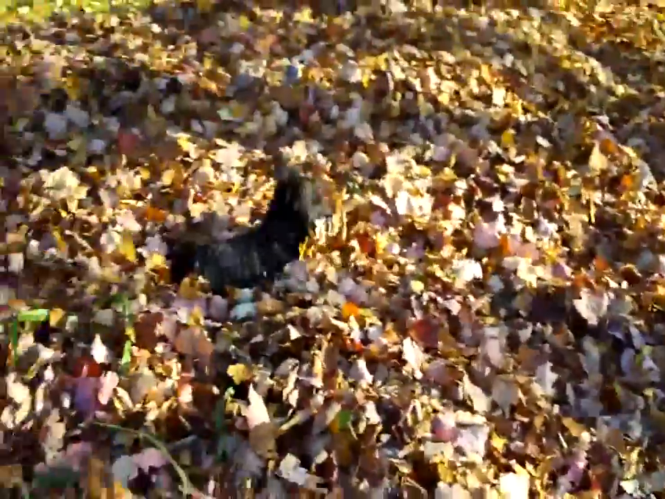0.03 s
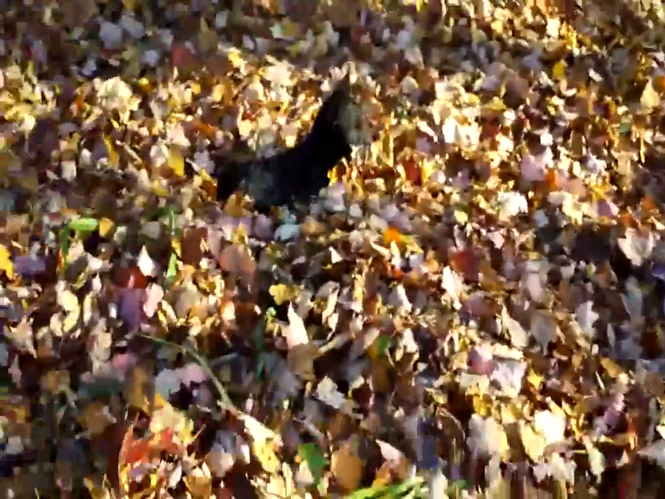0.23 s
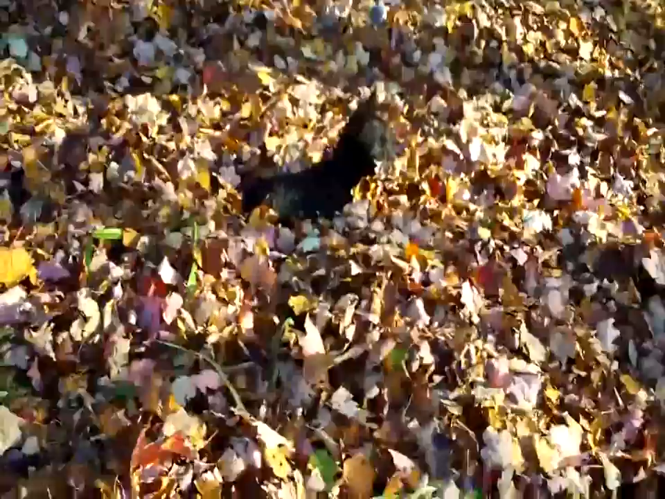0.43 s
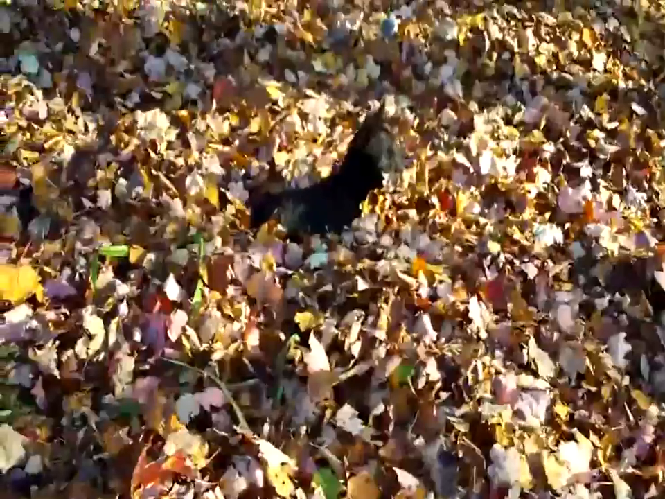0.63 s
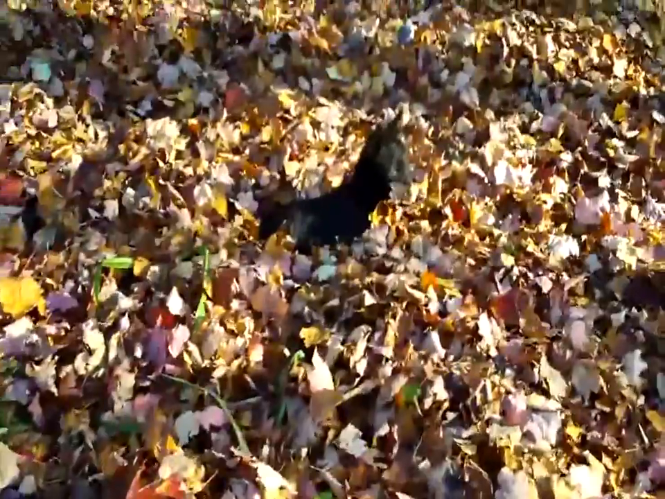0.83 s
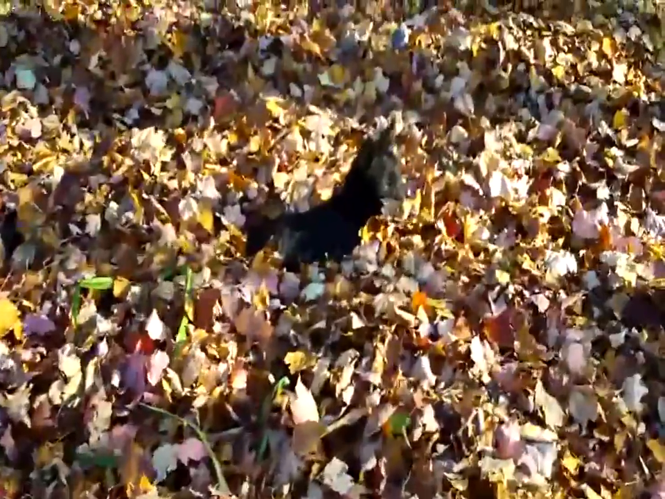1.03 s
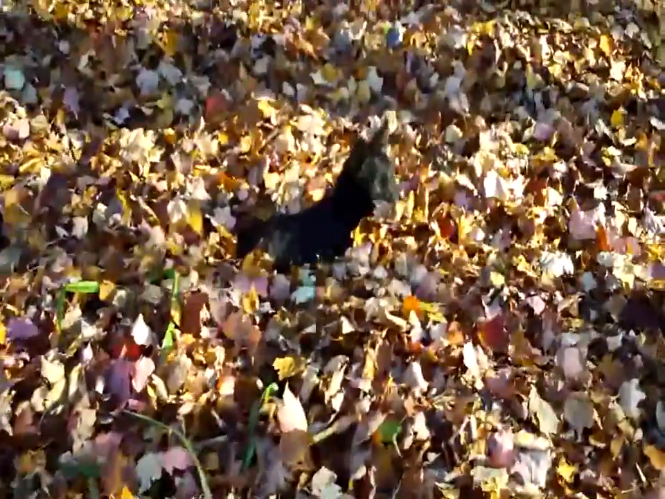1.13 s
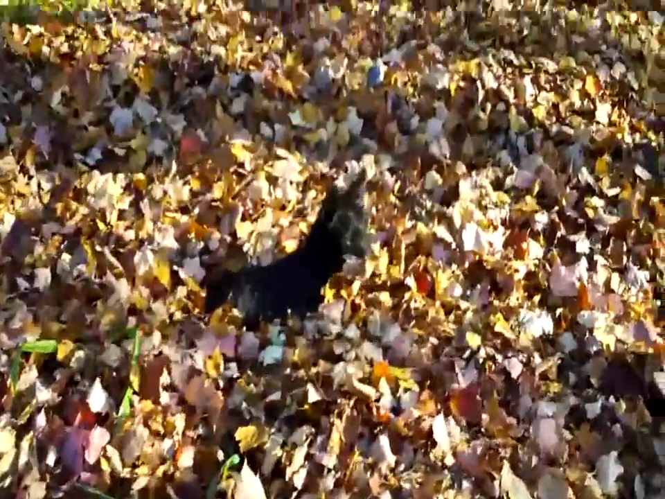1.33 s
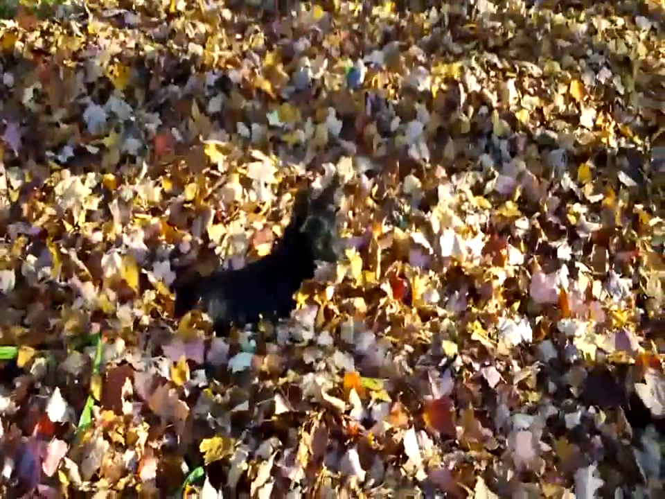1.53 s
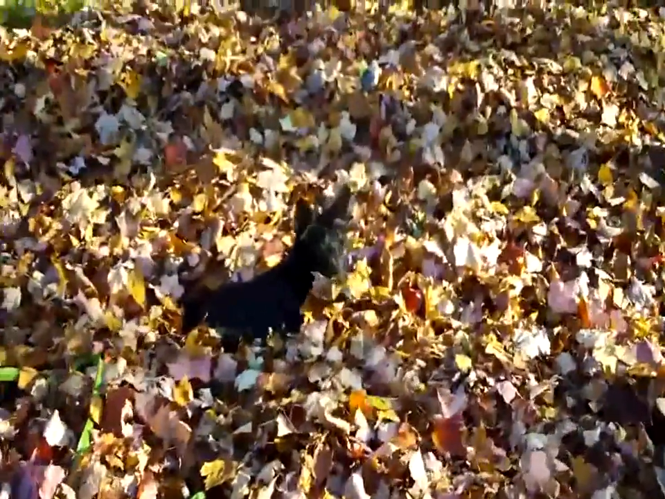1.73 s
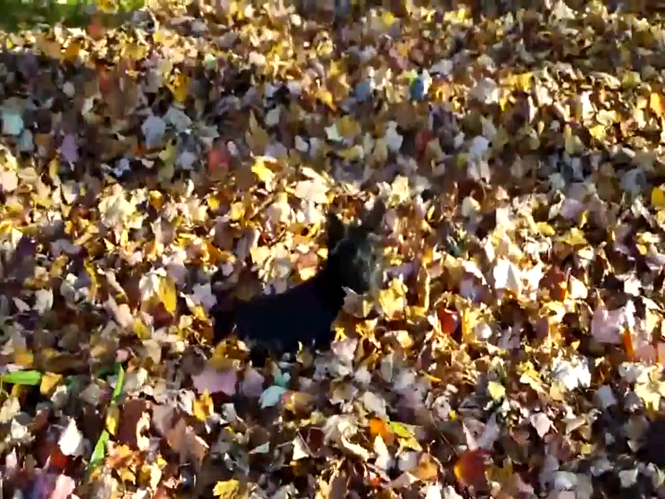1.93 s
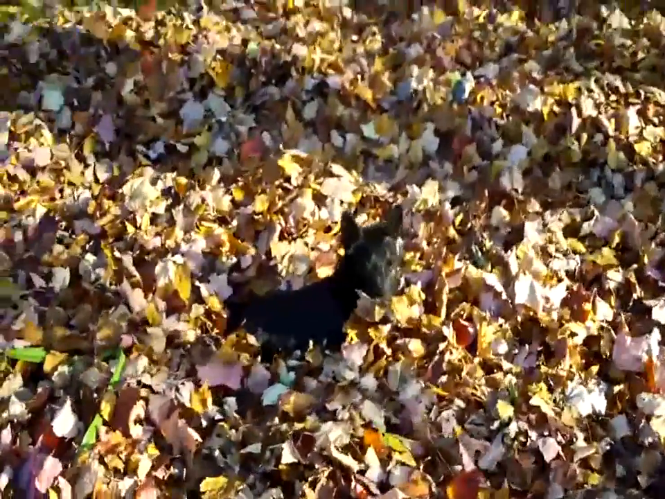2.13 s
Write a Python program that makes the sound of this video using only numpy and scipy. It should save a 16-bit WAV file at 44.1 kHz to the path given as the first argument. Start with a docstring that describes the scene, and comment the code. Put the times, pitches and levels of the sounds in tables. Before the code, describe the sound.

A small dog gives two sharp, raspy yaps in quick succession outdoors, each with a brief dull echo. Dry leaves rustle softly before and after, while light wind puffs on the microphone over a faint distant engine hum.

```python
"""A small dog lying in dry leaves yaps twice. In each yap a thin squeal arches up and down while the
voice catches on two throat resonances in turn, roughened by rasp, low growls and a few snaps of the
vocal folds. The yard answers with a short, dull echo. Leaves rustle and crackle in swells over a bed
of soft wind and the hum of a far engine."""
import sys
import numpy as np
from scipy import signal
from scipy.fft import rfft, irfft
from scipy.io import wavfile
from scipy.ndimage import uniform_filter1d

SR = 44100
rng = np.random.default_rng(int(sys.argv[2]) if len(sys.argv) > 2 else 0)


def waveform_to_disk(signal):
    """Save audio, clipped to [-1, 1], as 16-bit WAV at the path in sys.argv[1]."""
    frames = np.transpose(np.atleast_2d(signal))
    scaled = np.clip(frames, -1, 1) * 32767
    samples = np.round(scaled).astype(np.int16)
    wavfile.write(sys.argv[1], SR, samples)


N = 97020
T = np.arange(N) / SR

# tone of the outdoor air and of the wind puffs (frequency [Hz], relative level [dB])
AIR_COLOUR = [(20, 1.5), (32, -1.5), (42, -3), (55, 2), (72, -12), (105, -3.5), (160, -15.5), (280, -20),
              (420, -22.5), (750, -19), (1400, -23.5), (2500, -31.5), (5000, -33), (9000, -52.5)]
PUFF_COLOUR = [(10, 24), (28, -6), (55, -1.5), (120, -45), (500, -70)]
# wind puffs on the microphone (time [s], half length [s], level [dB])
PUFFS = [(.26, 0.15, -31.5), (.505, 0.053, -23.5), (1.91, 0.043, -42)]

# swells of the rustle (time [s], level [dB])
RUSTLE = [(0, -42), (.08, -46.5), (.15, -39.5), (.23, -43), (.4, -47), (.62, -67), (.85, -48), (.92, -47.5),
          (.98, -40), (1.08, -46), (1.3, -53.5), (1.42, -64), (1.48, -63), (1.7, -54), (1.85, -47.5),
          (1.92, -40), (2.1, -38.5), (2.2, -35)]
# soft shuffles deep in the leaves (time [s], half length [s], level [dB])
SHUFFLES = [(.16, 0.02, -53), (1.655, 0.047, -47.5), (1.745, .018, -43), (1.82, 0.02, -51),
            (1.98, 0.13, -47.5)]
# single leaves crackling (time [s], level [dB])
CRACKLES = [(1.444, -41), (1.775, -39.5), (1.786, -48)]
# tone of the three leaf layers (frequency [Hz], relative level [dB])
RUSTLE_COLOUR = [(200, -9), (600, -1.5), (1200, -1), (2500, 1), (3300, 0), (4400, 2), (5300, -1.5),
                 (6500, -19.5), (9000, -45)]
SHUFFLE_COLOUR = [(120, -25), (260, -19), (420, -5), (700, -3), (1400, -7), (2200, -23), (5000, -37)]
CRACKLE_COLOUR = [(1000, -23), (2500, -1), (4000, -2), (5300, 0), (6500, -15), (9000, -40)]

# rasp contour, per yap (time [s], level [dB])
RASP = [
    [(.676, -47), (.692, -37), (.701, -29.5), (.718, -29), (.745, -28.5), (.765, -30.5), (.785, -32.5),
     (.800, -37), (.812, -41)],
    [(1.108, -41.5), (1.122, -34.5), (1.138, -26), (1.150, -25.5), (1.168, -25), (1.185, -29.5),
     (1.215, -36.5), (1.229, -48), (1.238, -49)],
]
# throat resonances, per yap (frequency [Hz], width [Hz], relative level [dB])
THROATS = [
    [(810, 120, -10.5), (1540, 290, -1.5), (2330, 245, -4), (2910, 420, -8.5), (3700, 680, -15),
     (4680, 240, -8)],
    [(780, 44, -4), (1440, 206, 8.5), (1860, 180, 4.5), (2290, 600, 1.5), (3000, 270, -25), (4270, 184, 0)],
]
# low voice, high voice taking over as it breaks, and squeal, per yap (time [s], pitch [Hz], level [dB])
LOW_VOICE = [
    [(.679, 730, -36), (.698, 720, -27), (.713, 775, -26), (.722, 803, -16.5), (.738, 812, -17),
     (.750, 808, -29), (.762, 805, -44), (.777, 805, -30), (.800, 800, -32)],
    [(1.138, 770, -36), (1.145, 755, -27), (1.151, 785, -18), (1.166, 760, -21), (1.181, 755, -35),
     (1.205, 775, -32), (1.220, 760, -37), (1.228, 730, -30), (1.236, 610, -42), (1.250, 530, -44)],
]
HIGH_VOICE = [
    [(.741, 1410, -24), (.745, 1425, -19.5), (.753, 1450, -21), (.757, 1520, -32)],
    [(1.152, 1350, -32), (1.158, 1440, -23), (1.163, 1550, -29), (1.168, 1290, -25), (1.175, 1345, -17),
     (1.190, 1430, -21.5), (1.203, 1340, -25), (1.213, 1140, -29), (1.218, 1060, -40)],
]
SQUEALS = [
    [(.702, 980, -35), (.715, 1520, -29), (.727, 2200, -44), (.747, 2280, -27), (.756, 1880, -28),
     (.761, 1660, -30), (.773, 1770, -26), (.781, 1600, -28), (.793, 1080, -35)],
    [(1.109, 980, -38), (1.122, 1230, -27), (1.133, 1530, -29), (1.145, 1950, -32), (1.149, 2340, -32),
     (1.160, 2290, -29), (1.170, 1980, -30), (1.177, 1720, -29), (1.185, 1680, -42)],
]
# harmonics 2, 3, ... at full strength, the low voice's per yap (level against the fundamental [dB])
LOW_OVERTONES_DB = [(-25, -10, -42, -26), (-14, -19, -32, -24.5)]
HIGH_OVERTONES_DB, SQUEAL_OVERTONES_DB = (-22, -25), (-22, -28)
SQUEAL_JITTER = (.015, .035)  # per yap, as a share of the pitch
# growls as the folds start and stop (time [s], half length [s], level [dB])
GROWLS = [(.696, .016, -31), (.796, .008, -36), (1.238, .016, -43)]
# tone of the growls (frequency [Hz], relative level [dB])
GROWL_COLOUR = [(100, -44), (220, -3), (340, -9), (480, 0.5), (650, -12.5), (1000, -4), (1600, -30),
                (4000, -61)]
# snaps of the vocal folds (time [s], level into the throat [dB])
SNAPS = [(.6832, 5), (.6953, 13.5), (.7928, 7), (1.1490, -0.5), (1.2265, -1)]
# resonances of the slack throat (frequency [Hz], width [Hz], gain [dB])
SLACK_THROAT = [(583, 200, 3), (773, 110, 12.5), (1480, 370, -3), (2600, 530, -7.5), (3200, 480, -10.5),
                (4370, 170, -8.5)]
# slaps from the yard (delay [s], gain [dB])
ECHOES = [(.030, -32), (.060, -16.5), (.085, -29), (.110, -29)]


def undb(db):
    """Decibels to gain."""
    return 10 ** (np.asarray(db) / 20)


def unit(x):
    """Scale to rms 1."""
    return x / np.sqrt(np.mean(x ** 2))


def drift(rate_hz):
    """Smooth random modulation with rms 1."""
    span = max(int(SR / rate_hz), 1)
    smoothed = uniform_filter1d(rng.standard_normal(N), span, mode="wrap")
    return unit(uniform_filter1d(smoothed, span, mode="wrap"))


def lowpass(x, hz):
    """Gentle treble roll-off."""
    return signal.sosfilt(signal.butter(2, hz, fs=SR, output="sos"), x)


def colour(x, points):
    """EQ through (frequency [Hz], relative level [dB]) points, scaled to rms 1."""
    hz, db = np.array(points).T
    bins_hz = np.maximum(np.fft.rfftfreq(N, 1 / SR), 1)
    curve = undb(np.interp(np.log(bins_hz), np.log(hz), db))
    return unit(irfft(rfft(x) * curve, N))


def noise(points):
    """Coloured noise with rms 1."""
    return colour(rng.standard_normal(N), points)


def resonate(x, modes, low_cut_hz):
    """Parallel resonances of alternating polarity, then a low cut."""
    ringing = sum((-1) ** k * undb(db) * signal.lfilter(*signal.iirpeak(hz, hz / width, fs=SR), x)
                  for k, (hz, width, db) in enumerate(modes))
    return signal.sosfilt(signal.butter(2, low_cut_hz, "high", fs=SR, output="sos"), ringing)


def swells(rows):
    """Bell-shaped fades from (time [s], half length [s], level [dB]) rows."""
    return sum(undb(db) * np.exp(-((T - s) / half) ** 2) for s, half, db in rows)


def envelope(times, db, attack_s=0.012, release_s=0.0058):
    """A level contour with a quick attack before it and a release after it."""
    before, after = np.maximum(times[0] - T, 0), np.maximum(T - times[-1], 0)
    return undb(np.interp(T, times, db)) * np.exp(-before / attack_s - after / release_s)


def wind(air_db=-37, side_db=-30):
    """A bed of soft air, a touch of stereo width in its rumble, and low puffs on the microphone."""
    mid, side = (noise(AIR_COLOUR) * undb(air_db + 0.6 * drift(10)) for _ in range(2))
    side = undb(side_db) * lowpass(side, hz=1500)
    puffs = noise(PUFF_COLOUR) * swells(PUFFS)
    return mid + puffs + np.array([side, -side])


def leaves(grains_per_s=5000, grain_spread_db=-0.08, crackle_decay_s=0.0099):
    """Tiny cracks of dry leaves blur into a rustle, with dull shuffles below and bright crackles on top."""
    grains = (rng.random(N) < grains_per_s / SR) * rng.standard_normal(N)
    grains *= undb(grain_spread_db * rng.exponential(size=N))
    rustle_db = np.interp(T, *np.array(RUSTLE).T) + drift(40)
    rustle = colour(grains, RUSTLE_COLOUR) * undb(rustle_db)
    shuffles = noise(SHUFFLE_COLOUR) * swells(SHUFFLES)
    bursts = sum(undb(db) * (T > s) * np.exp(-abs(T - s) / crackle_decay_s) for s, db in CRACKLES)
    return rustle + shuffles + noise(CRACKLE_COLOUR) * bursts


def far_engine(hum_hz=125):
    """A far engine's wavering hum and its faint octave, fading up just ahead of the first yap."""
    phase = 2 * np.pi * np.cumsum(hum_hz * (1 + 0.0124 * drift(6))) / SR
    hum = undb(-46.5) * np.sin(phase) + undb(-62) * np.sin(2 * phase)
    fader_db = np.interp(T, [.3, .6], [-7, 1]) + 1.44 * drift(20)
    return np.sqrt(2) * hum * undb(fader_db)


def rasp():
    """Fluttering breath noise rings the throat and gives each yap its grit."""
    out = np.zeros(N)
    for contour, throat in zip(RASP, THROATS):
        breath = rng.standard_normal(N) * undb(1.4 * drift(600))
        out += unit(resonate(breath, throat, low_cut_hz=450)) * envelope(*np.array(contour).T)
    return out


def fold_tone(contour, overtones_db, jitter, shimmer):
    """One vibration of the vocal folds, unsteady in pitch and level, brighter as it gets louder."""
    times, hz, db = np.array(contour).T
    pitch_hz = np.interp(T, times, hz) * (1 + jitter * drift(560))
    phase = 2 * np.pi * np.cumsum(pitch_hz) / SR
    strength = envelope(times, db)
    overtones = sum(undb(level) * np.sin(k * phase) for k, level in enumerate(overtones_db, 2))
    tone = np.sin(phase) + overtones * strength / strength.max()
    return np.sqrt(2) * tone * strength * (1 + shimmer * drift(630))


def voice():
    """Three fold vibrations overlap in each yap: a low voice breaks to a high one under a thin squeal."""
    out = np.zeros(N)
    for yap in range(len(SQUEALS)):
        out += fold_tone(LOW_VOICE[yap], LOW_OVERTONES_DB[yap], jitter=.014, shimmer=0.064)
        out += fold_tone(SQUEALS[yap], SQUEAL_OVERTONES_DB, jitter=SQUEAL_JITTER[yap], shimmer=0.29)
        out += fold_tone(HIGH_VOICE[yap], HIGH_OVERTONES_DB, jitter=0.0156, shimmer=0.057)
    return out


def growl(flap_hz=114.5):
    """Slack folds flap unevenly and chop the air into low puffs."""
    cycle = np.cumsum(flap_hz * (1 + .15 * drift(87))) / SR % 1
    chopped_air = rng.standard_normal(N) * np.exp(-cycle / 0.45)
    return colour(chopped_air, GROWL_COLOUR) * swells(GROWLS)


def fold_snaps():
    """The folds snap as they open and close, and each click rings the slack throat."""
    clicks = np.zeros(N)
    for s, db in SNAPS:
        clicks[int(s * SR)] = undb(db)
    return resonate(clicks, SLACK_THROAT, low_cut_hz=233)


def yard(x, t60_s=0.7, tail_db=-24.5):
    """The yard throws back a few dull slaps and a short scattered tail; wet signal only."""
    slaps = sum(undb(db) * np.interp(T - delay, T, x, left=0) for delay, db in ECHOES)
    tail = lowpass(rng.standard_normal(N), hz=3000) * undb(-60 * T / t60_s)
    tail *= 1 - np.exp(-T / 0.01)  # soft onset
    reverb = signal.fftconvolve(x, tail / np.linalg.norm(tail))[:N]
    return lowpass(slaps, hz=3650) + undb(tail_db) * reverb


def scene():
    """The dog dead centre in its yard, over wind, leaves and engine."""
    bed = wind() + leaves() + far_engine()
    yaps = rasp() + voice() + growl() + fold_snaps()
    return bed + yaps + yard(yaps)


def record(dry, step=4, top_hz=10500):
    """Lo-fi colour: coarse samples joined by straight lines mirror the sound faintly into the treble."""
    coarse = lowpass(dry, hz=8000)[:, ::step]
    joined = np.array([np.interp(T, T[::step], channel) for channel in coarse])
    steep_high_cut = signal.ellip(10, .2, 80, top_hz, fs=SR, output="sos")
    return signal.sosfilt(steep_high_cut, joined)


dry = scene()
out = record(dry)
waveform_to_disk(out)
```